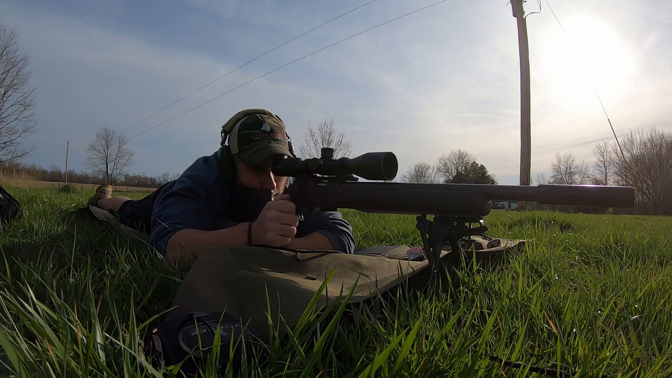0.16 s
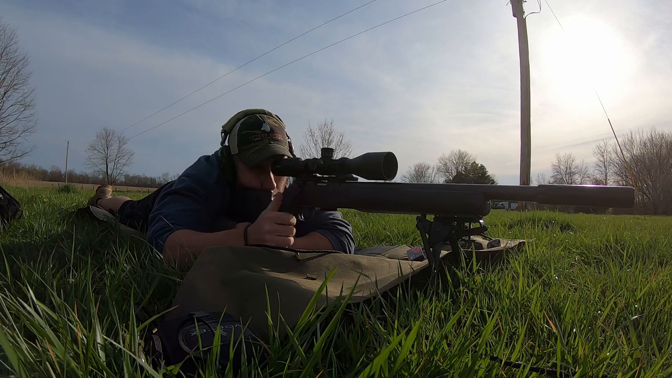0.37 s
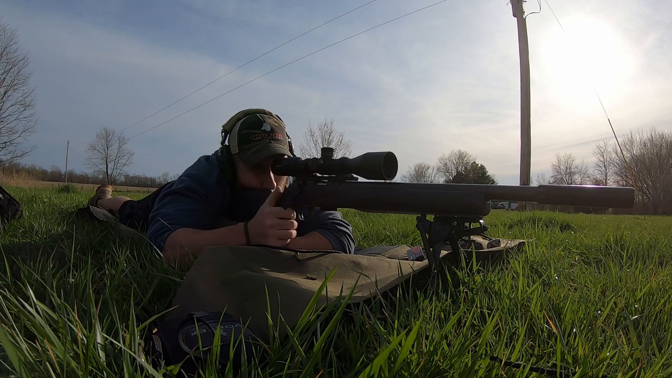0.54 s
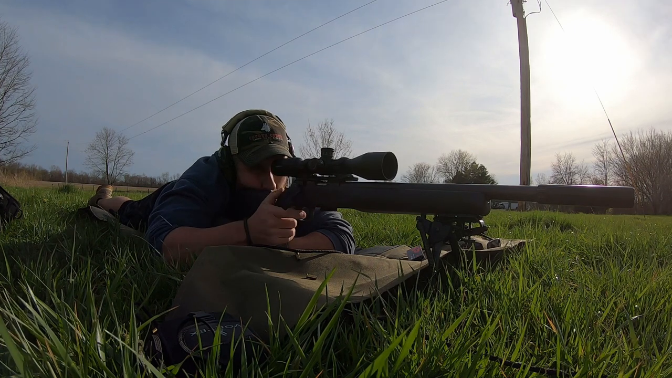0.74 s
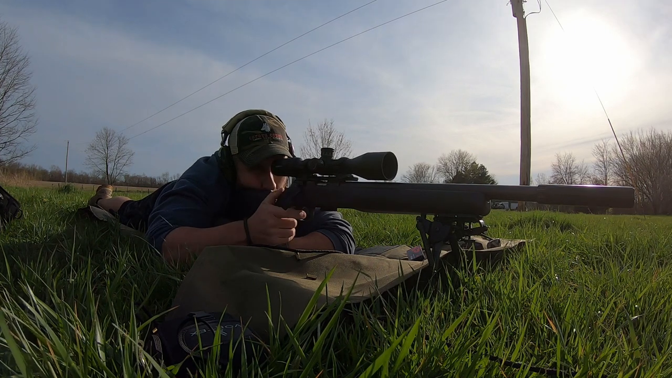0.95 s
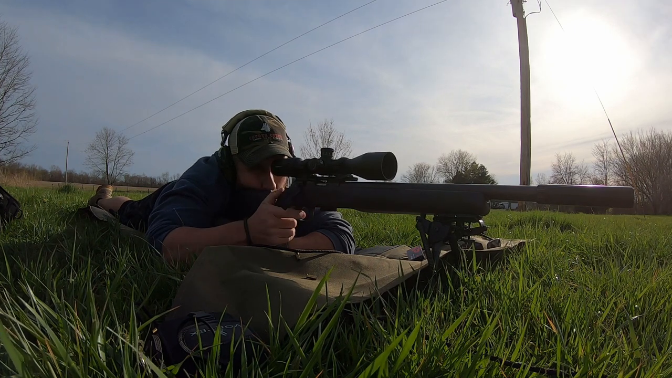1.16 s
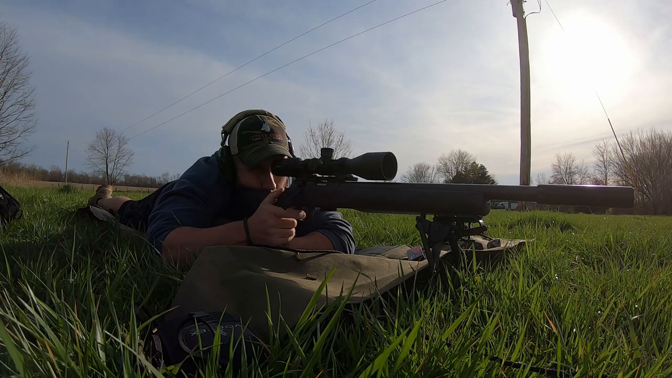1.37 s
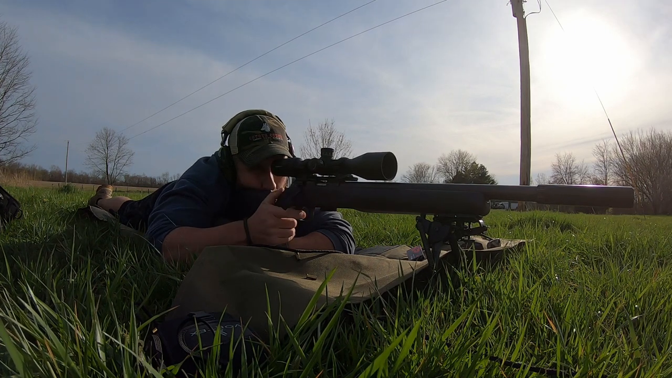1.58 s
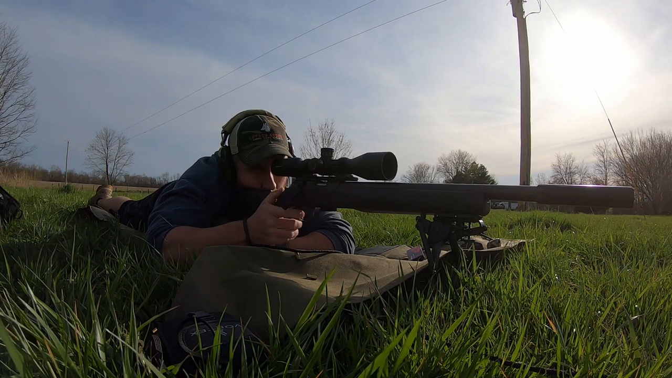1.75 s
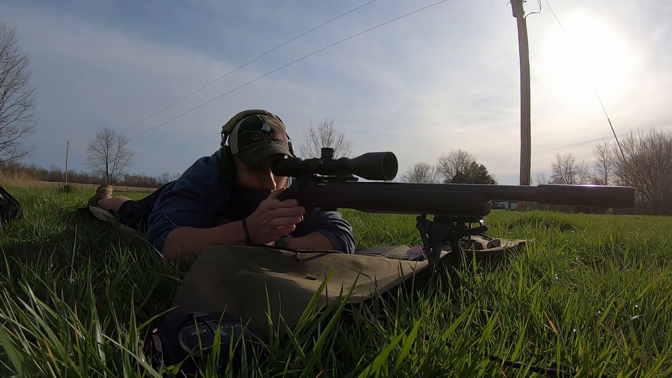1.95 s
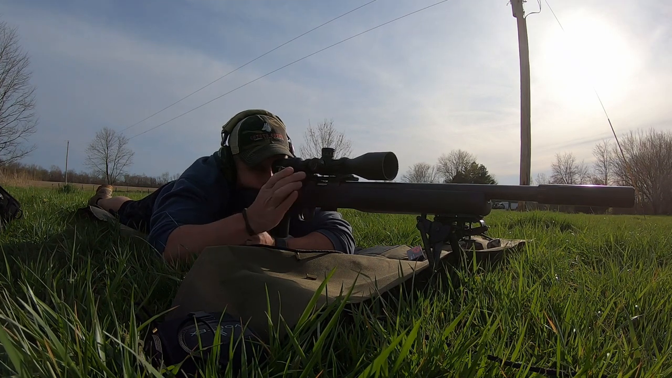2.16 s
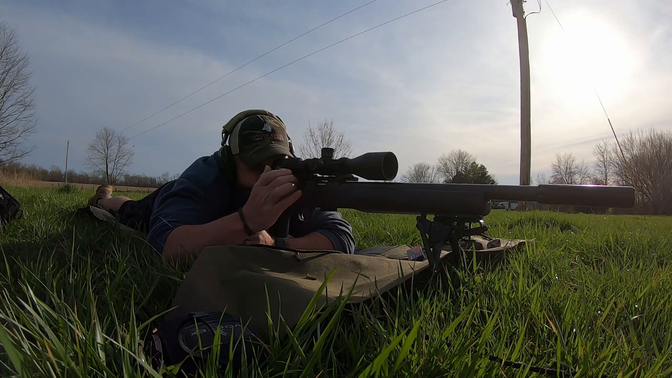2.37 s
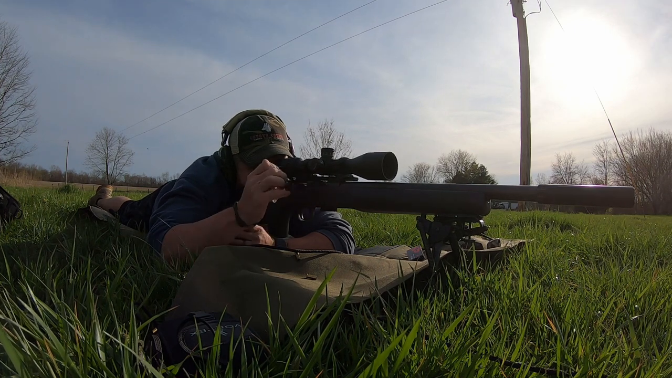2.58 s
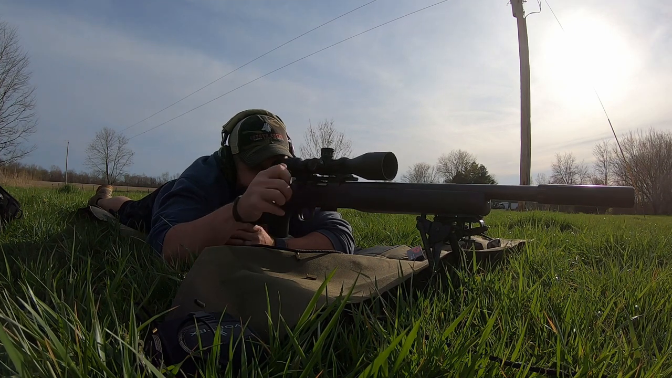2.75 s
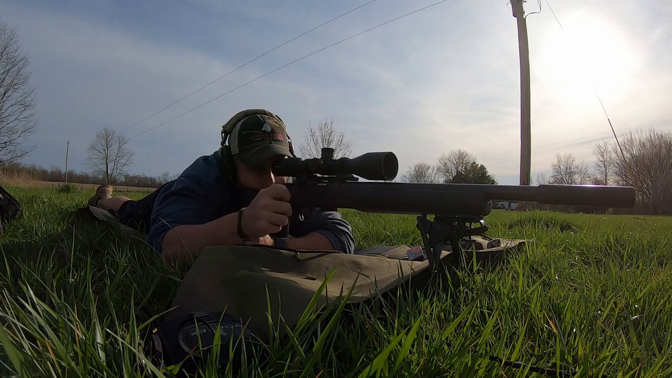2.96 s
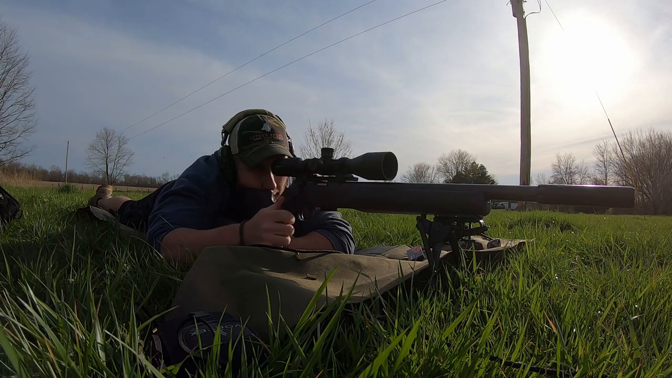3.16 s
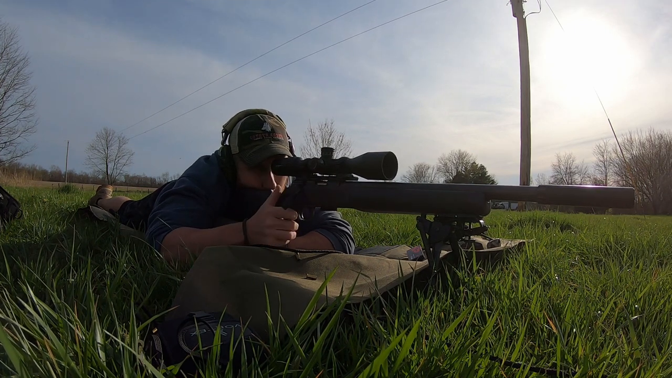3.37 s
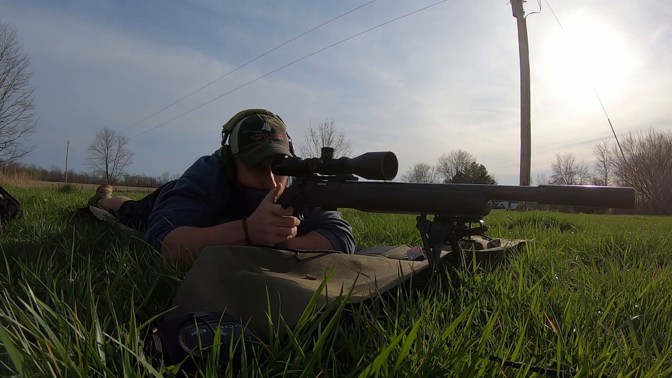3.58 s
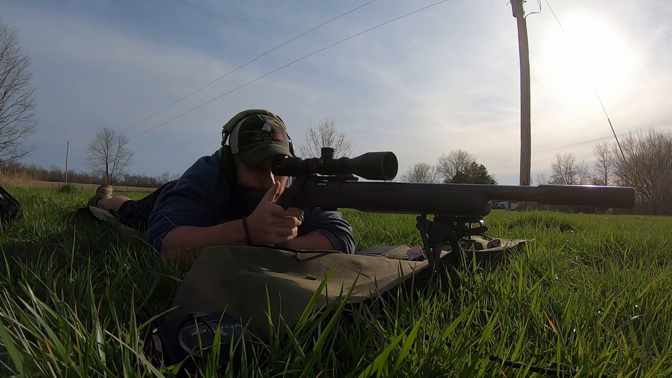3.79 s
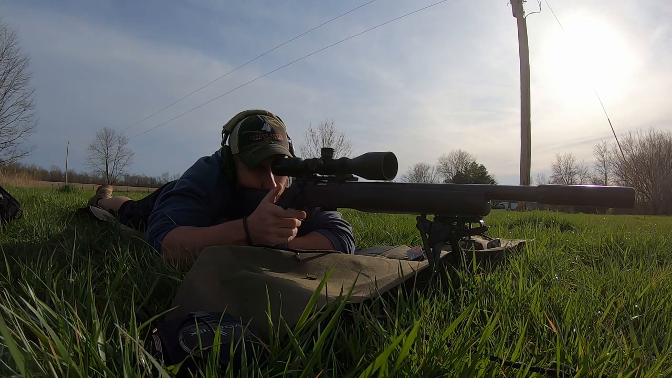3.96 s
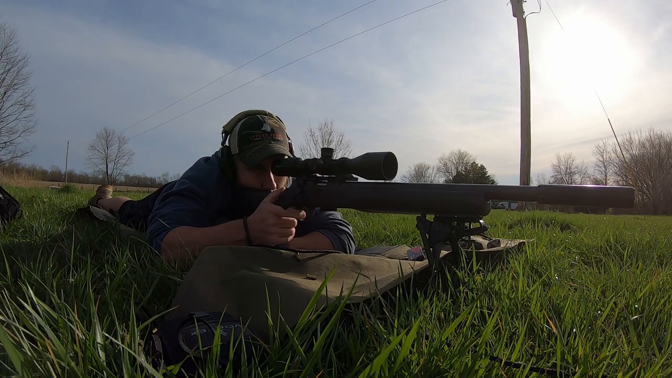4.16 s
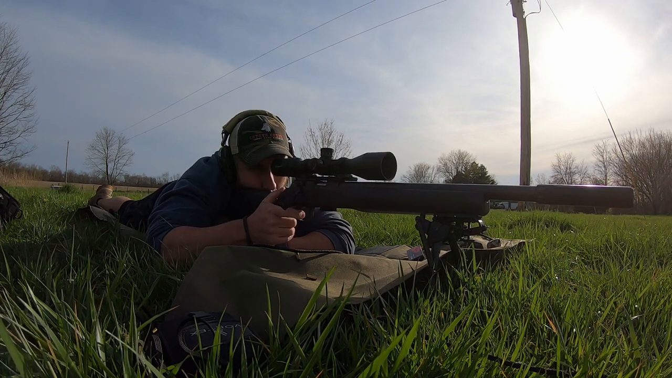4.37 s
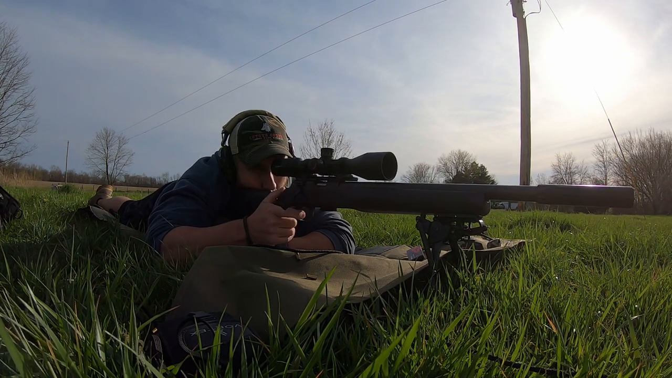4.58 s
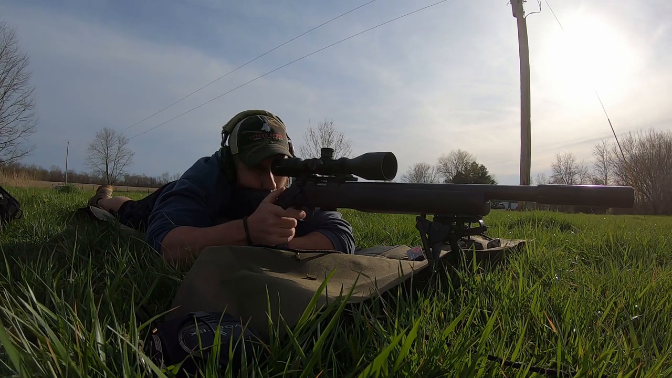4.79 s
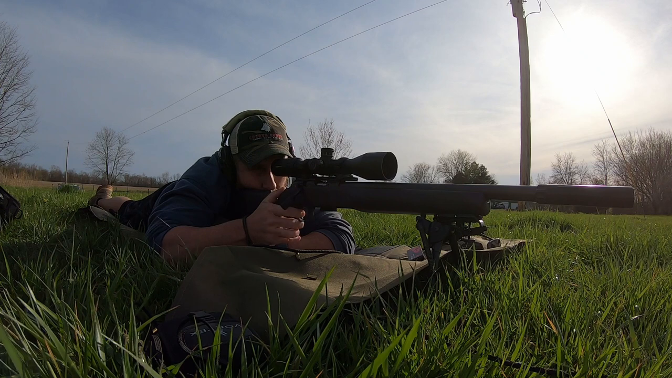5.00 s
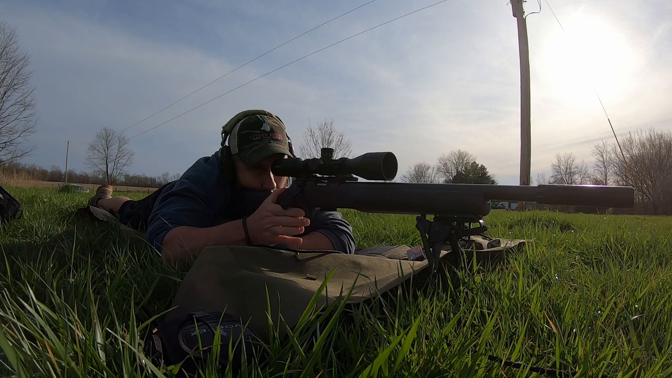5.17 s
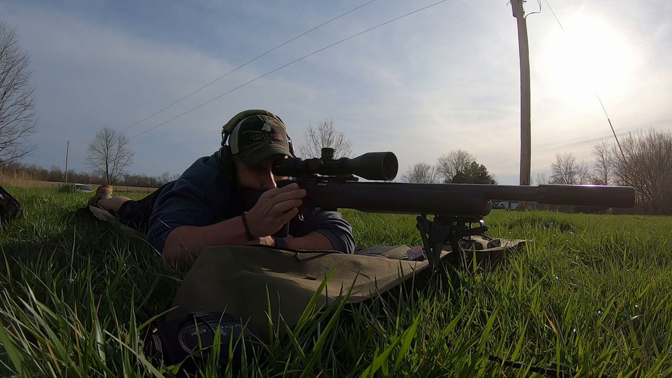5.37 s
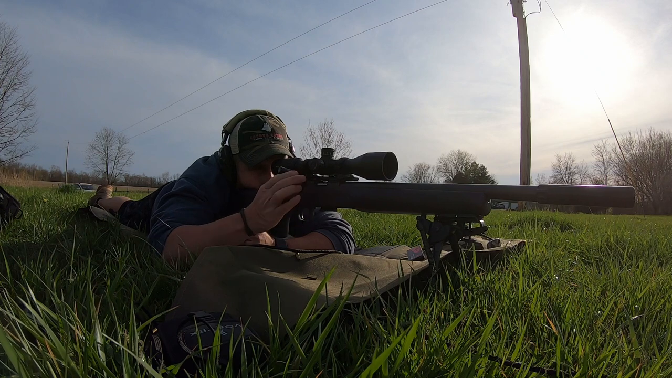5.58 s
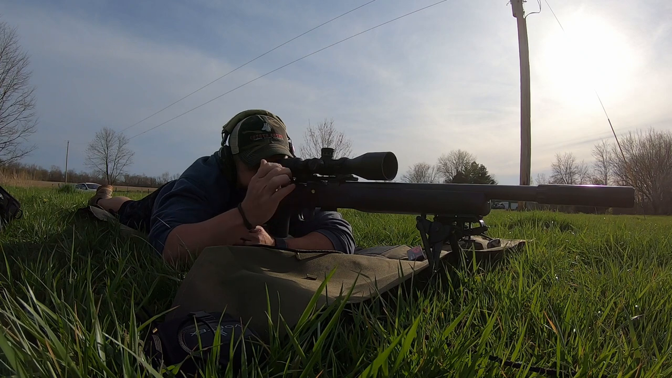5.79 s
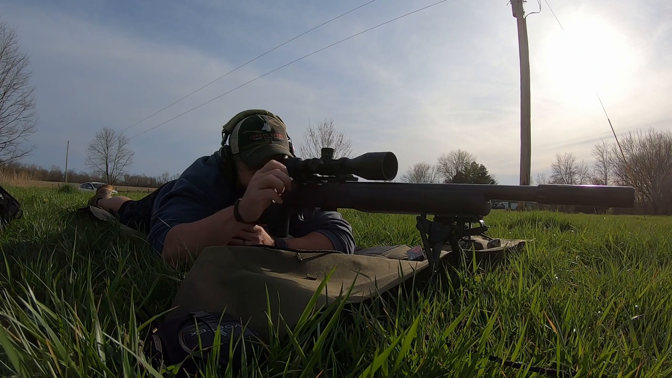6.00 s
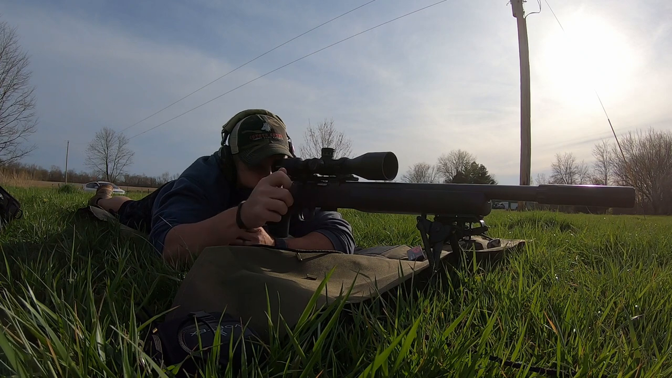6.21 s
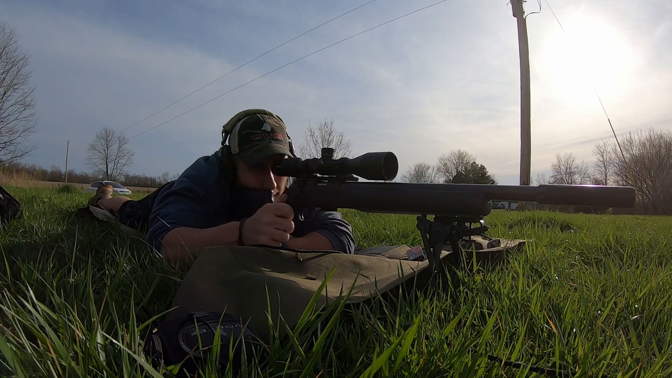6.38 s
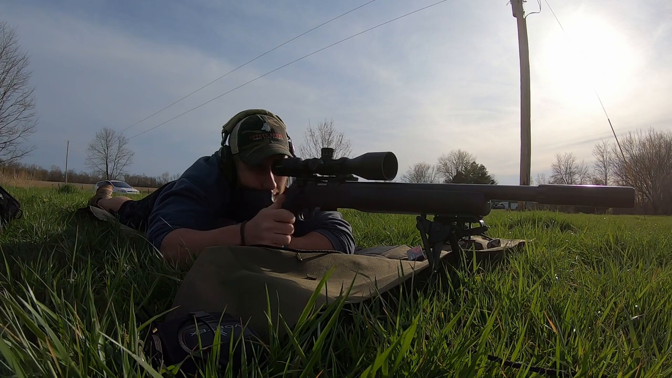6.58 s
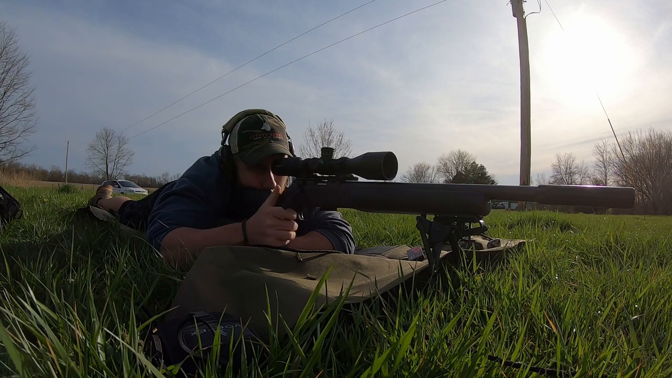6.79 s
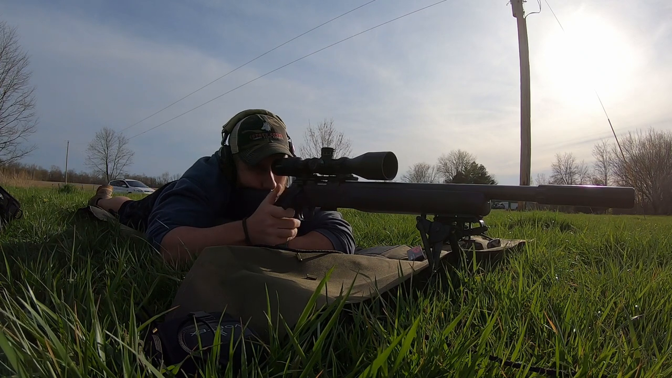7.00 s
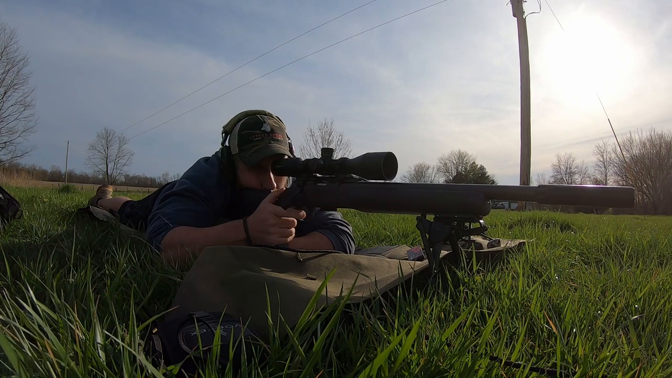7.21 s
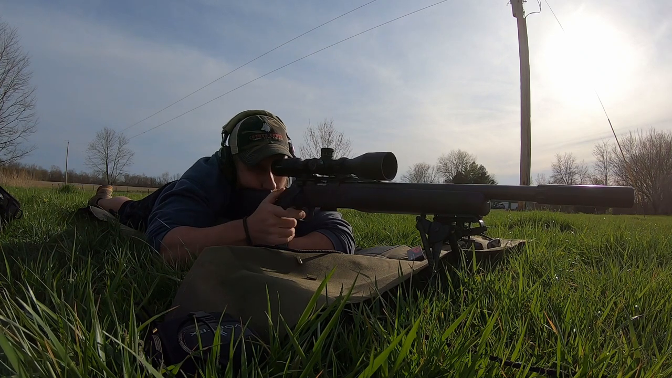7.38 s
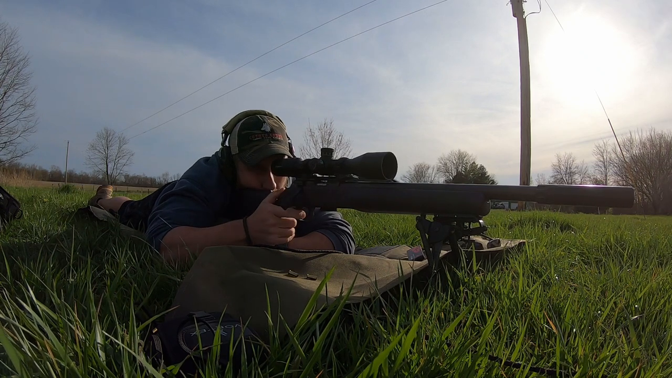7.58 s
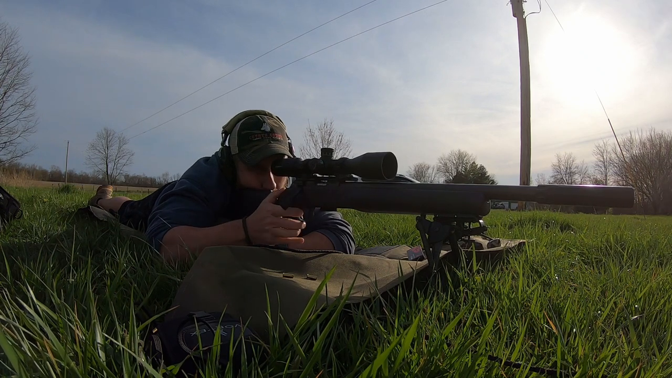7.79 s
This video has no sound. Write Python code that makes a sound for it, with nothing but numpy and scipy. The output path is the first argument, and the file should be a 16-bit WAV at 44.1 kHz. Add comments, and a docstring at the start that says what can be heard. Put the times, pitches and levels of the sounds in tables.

```python
"""Suppressed rifle on a lawn

A small-bore rifle fires three shots (gas noise plus a pressure swing); its bolt is worked between them.
Cracks return from buildings and trees as shaped noise; the bullet smacks a far target.
Wind noise buffets a microphone in the grass, over hiss and rustle.
A motor of wavering partials drones far off; a bird, a gliding sine, whistles three times."""
import sys
import numpy as np
from scipy import signal
from scipy.fft import rfft, irfft, next_fast_len
from scipy.io import wavfile
from scipy.ndimage import uniform_filter1d

SR = 44100
rng = np.random.default_rng(int(sys.argv[2]) if len(sys.argv) > 2 else 0)


def generate_wav(signal):
    """Clip the signal to [-1, 1] and save it as 16-bit WAV at the path in sys.argv[1]."""
    frames = np.transpose(np.atleast_2d(signal))
    scaled = np.clip(frames, -1, 1) * 32767
    pcm = np.round(scaled).astype(np.int16)
    wavfile.write(sys.argv[1], SR, pcm)


N = 346185
TIME = np.arange(N) / SR


def from_db(db):
    """Decibels to gain."""
    return 10 ** (np.asarray(db) / 20)


def rms_one(x):
    """Scale to unit power."""
    return x / np.sqrt(np.mean(x ** 2) + 1e-20)


def level(rows):
    """Gain over time from rows of (time_s, level_db), linear in dB between them."""
    return from_db(np.interp(TIME, *np.transpose(rows)))


def add(out, start_s, sound):
    """Mix a sound in, starting at start_s."""
    i = max(0, round(start_s * SR))
    out[i:i + len(sound)] += sound[:max(0, N - i)]


def colour(x, points):
    """Causal (minimum-phase) filter from rows of (freq_hz, gain_db), built by folding the cepstrum."""
    size = next_fast_len(len(x) // 2 + 1) * 2
    freq_hz, gain_db = np.transpose(points)
    bins_hz = np.arange(size // 2 + 1) * SR / size
    log_gain = np.log(from_db(np.interp(np.log(bins_hz + 1), np.log(freq_hz), gain_db)))
    cepstrum = irfft(log_gain)
    cepstrum[1:size // 2] *= 2
    cepstrum[size // 2 + 1:] = 0
    response = np.exp(rfft(cepstrum))
    return irfft(rfft(x, size) * response)[:len(x)]


def noise(points, size):
    """Coloured noise of unit power."""
    return rms_one(colour(rng.standard_normal(size), points))


def band(x, low_hz, high_hz, order=2):
    """Butterworth band-pass."""
    edges_hz = [low_hz, min(high_hz, SR / 2 - 1)]
    return signal.sosfilt(signal.butter(order, edges_hz, "band", fs=SR, output="sos"), x)


def resonate(x, modes, spread_db):
    """Parallel two-pole resonances, each with a random sign and a strength of its own."""
    out = 0
    for freq_hz, width_hz, level_db in modes:
        radius = np.exp(-np.pi * width_hz / SR)
        angle = 2 * np.pi * freq_hz / SR
        poles = [1, -2 * radius * np.cos(angle), radius * radius]
        ringing = signal.lfilter([1, 0, -1], poles, x)
        gain = from_db(level_db + spread_db * rng.normal())
        out = out + rms_one(ringing) * gain * rng.choice([-1, 1])
    return out


def dying(t, t60):
    """Envelope that falls 60 dB in t60 seconds; held at one while t is negative."""
    return np.exp(-np.log(1000) * np.maximum(t, 0) / t60)


def even(x, span_s):
    """Hold the short-term power of a noise steady."""
    return x / np.sqrt(uniform_filter1d(x * x, max(2, int(span_s * SR))) + 1e-12)


def grainy(size, grain_db, grain_s):
    """Uneven random gain of unit power."""
    knots = np.arange(0, size + 1, max(4., grain_s * SR))
    heights = 2 * rng.random(size)[:len(knots)] - 1
    return rms_one(from_db(grain_db * np.interp(np.arange(size), knots, heights)))


# airy hiss over time: time_s, level_db
AIR_LEVEL = [(0, -50.5), (.55, -51.5), (.72, -56.5), (1.9, -61.5), (2.3, -51.5), (2.95, -48.5),
             (3.2, -61.5), (4.3, -61.5), (5.7, -47.5), (6.7, -59), (7.05, -60.5), (7.09, -53.5)]
# hiss spectrum: freq_hz, density_db_per_hz (relative)
AIR_COLOUR = [(200, 7.5), (600, -2), (850, -0.5), (1150, 2.5), (1450, -1), (2100, -7.5), (3300, -8.5),
              (4400, -15.5), (5300, -27.5), (6200, -59), (8000, -57), (15000, -67)]


def air():
    """Airy hiss: coloured noise whose level drifts, with one quick step up near the end."""
    return level(AIR_LEVEL) * noise(AIR_COLOUR, N)


# grass in the breeze: time_s, level_db
RUSTLE_LEVEL = [(0, -74), (.2, -74), (.37, -62.5), (.5, -74), (.75, -75), (1.0, -90), (7.85, -100)]
# rustle spectrum: freq_hz, density_db_per_hz (relative)
RUSTLE_COLOUR = [(800, -16.5), (2000, -0.5), (3400, -1), (5000, -4), (6300, -16.5), (8000, -9),
                 (11000, -19.5), (15000, -33.5)]


def grass():
    """Grass rustling in the breeze: grainy bright noise."""
    return level(RUSTLE_LEVEL) * noise(RUSTLE_COLOUR, N) * grainy(N, 6.0, 0.0036)


# rumble on the microphone: time_s, level_db
WIND_LEVEL = [(0, -43), (.3, -42), (.5, -33.5), (.98, -33), (1.35, -35.5), (2.05, -35.5), (2.5, -37.5),
              (2.75, -31.5), (3.0, -37.5), (3.87, -37), (4.28, -30.5), (4.6, -39), (4.95, -33), (5.45, -37),
              (5.85, -31), (6.56, -31.5), (6.91, -35), (7.3, -33.5)]
# rumble spectrum: freq_hz, density_db_per_hz (relative)
WIND_COLOUR = [(15, -4.5), (30, 4), (60, 3), (100, 0.5), (170, -5), (250, -22.5), (350, -18), (500, -22.5),
               (800, -35.5), (1500, -71), (4000, -72)]
# strongest buffets: peak_s, half_length_s, level_db (before halving), upper_edge_hz, hoot_hz
BUFFETS = [(.36, 0.049, -24.5, 275, 394), (.625, .046, -29, 360, 437), (1.039, 0.066, -18.5, 358, 507),
           (1.601, 0.062, -23.5, 240, 353), (2.01, 0.054, -18, 332, 567), (2.082, 0.056, -25.5, 100, 1000),
           (2.154, .042, -18, 220, 486), (2.223, .03, -17.5, 180, 295), (4.02, 0.07, -14, 250, 376),
           (4.145, .04, -23.5, 300, 406), (4.876, .049, -18.5, 350, 420), (4.924, 0.039, -18, 314, 714),
           (5.021, 0.031, -24, 180, 760), (5.265, 0.055, -17, 307, 482), (5.99, .1, -21, 388, 640),
           (6.579, 0.079, -24.5, 270, 700), (7.151, 0.17, -27.5, 305, 450), (7.573, 0.078, -18, 239, 400),
           (7.676, 0.047, -24, 300, 555)]


def wind(eddies_db=-9, lumps_db=10, hoot_width=0.14, hoot_rel_db=-20):
    """Rumble and small eddies at the microphone port; strong eddies strike as buffets with a hollow hoot."""
    eddies = rms_one(band(rng.standard_normal(N), 51, 230, order=3)) * grainy(N, lumps_db, .045)
    rumble = even(noise(WIND_COLOUR, N), 0.14)
    out = level(WIND_LEVEL) * (rumble + from_db(eddies_db) * eddies)
    for peak_s, half_length_s, level_db, edge_hz, hoot_hz in BUFFETS:
        size = int(2 * half_length_s * SR)
        spectrum = [(20, -6), (60, 0), (edge_hz * 0.55, -1), (edge_hz, -11), (edge_hz * 2, -36), (edge_hz * 8, -85)]
        eddy = noise(spectrum, size)
        low_hz, high_hz = hoot_hz * (1 - hoot_width), hoot_hz * (1 + hoot_width)
        hoot = band(rng.standard_normal(2 * size), low_hz, high_hz, order=3)[size:]  # settled half
        shape = np.hanning(size) ** 2
        buffet = rms_one(eddy * shape) + from_db(hoot_rel_db) * rms_one(hoot * shape)
        add(out, peak_s - half_length_s, from_db(level_db) * buffet / 2)
    return out


# loudness: time_s, level_db (of the partials)
MOTOR_LEVEL = [(0, -46.5), (.9, -38.5), (1.8, -38.5), (2.6, -41.5), (3.0, -34.5), (3.7, -32), (4.1, -34),
               (4.6, -51.5), (7.0, -53), (7.12, -38.5), (7.85, -56.5)]
# partials: multiple of the firing rate, level_db (relative)
MOTOR_PARTIALS = [(2, -9.5), (3, -6), (4, -1.5), (6, -17), (8, -26.5)]


def motor(firing_hz=49.2, waver_hz=3.3, waver=0.18, growl_rel_db=-7):
    """A far engine: partials that waver on their way through the air, over a low growl."""
    partials = 0
    for multiple, level_db in MOTOR_PARTIALS:
        slow = signal.resample(rng.standard_normal((int(2 * waver_hz * N / SR), 2)), N // 100)
        slow_s = np.linspace(0, TIME[-1], len(slow))
        swing, phase = (np.interp(TIME, slow_s, column) for column in slow.T)
        tone = np.sin(2 * np.pi * multiple * firing_hz * TIME + 2 * waver * phase)
        partials = partials + from_db(level_db) * (1 + waver * swing) * tone
    growl = from_db(growl_rel_db) * rms_one(band(rng.standard_normal(N), 135, 230.7, order=3))
    return level(MOTOR_LEVEL) * (rms_one(partials) + growl)


# calls: start_s, level_db
CALLS = [(3.115, -58), (3.385, -50), (3.662, -48.5)]
# shape of a call: time_into_call_s, pitch_hz, level_db (relative to the call)
WHISTLE = [(0, 3150, -20), (.015, 2970, -2), (.052, 3030, 0), (.068, 2860, -1), (.088, 2480, -5),
           (.112, 2260, -7), (.125, 2290, -26), (.14, 2760, -10), (.16, 2660, -11), (.175, 2750, -50)]


def bird(flutter_db=3.0):
    """A held whistle that slurs down and ends in a soft grace note, fluttering in the wind."""
    out = np.zeros(N)
    point_s, point_hz, point_db = np.transpose(WHISTLE)
    t = TIME[:int(point_s[-1] * SR)]
    for start_s, call_db in CALLS:
        pitch_hz = np.interp(t, point_s, point_hz) * (1 + 0.0032 * rng.normal())
        gain = from_db(call_db + np.interp(t, point_s, point_db))
        call = gain * np.sin(2 * np.pi * np.cumsum(pitch_hz) / SR)
        add(out, start_s, call * grainy(len(t), flutter_db, 0.0071))
    return out


def among_trees(x, wet_db=-20, t60=.6):
    """A far sound with the soft tail that trees send back: convolution with decaying noise."""
    tail = rng.standard_normal(SR) * dying(TIME[:SR], t60)
    return x + from_db(wet_db) * signal.fftconvolve(x, tail / np.linalg.norm(tail))[:N]


# resonances of each part: freq_hz, width_hz, level_db (relative)
STOCK_MODES = [(292, 210, -8.5), (426, 28, -3), (531, 73, -1.5), (758.5, 110, 0), (1008, 90, -3),
               (1284, 150, -3.5)]
HANDLE_MODES = [(1631, 110, -5), (1980, 190, -5), (2243, 150, -1.5), (2510, 530, 0)]
STEEL_MODES = [(2940, 160, -3), (3185, 200, 0.5), (3566, 140, -2.5), (4053, 120, -4), (4420, 78, -8.5),
               (4690, 140, -8.5), (5310, 250, -13.5), (6000, 220, -11.5)]
TICK_MODES = [(7230, 370, 4.5), (7660, 330, -9), (10200, 900, -5), (12030, 2600, -4.5)]


def contact(levels_db, chatter_t60=0.012, seat_s=.0012, after_db=-25, after_t60=0.1, grain_db=5.5):
    """One contact seats over a millisecond and chatters, ringing stock, handle and steel."""
    out, t, window = 0, TIME[:SR // 10], SR // 125
    parts = [(STOCK_MODES, 220, 1500), (HANDLE_MODES, 1300, 2900),
             (STEEL_MODES, 2500, 5600), (TICK_MODES, 6200, 12500)]
    decay = dying(t - seat_s, chatter_t60) + from_db(after_db) * dying(t, after_t60)
    shape = np.minimum(t / seat_s, 1) * decay
    force = rng.standard_normal(len(t)) * shape * grainy(len(t), grain_db, 0.00045)
    for (modes, low_hz, high_hz), level_db in zip(parts, levels_db):
        ring = band(resonate(force, modes, spread_db=1.0), low_hz, high_hz, order=3)
        out = out + from_db(level_db) * ring / np.sqrt(2 * np.mean(ring[:window] ** 2))  # level of first 8 ms
    return out


# burst spectrum: freq_hz, density_db_per_hz (relative)
BURST_COLOUR = [(500, -11), (1200, 17), (2400, 20), (3600, -5.5), (4700, -37), (5800, -38.5), (9000, -46.5),
                (15000, -56.5)]


def burst(length_s, noise_db, ring_db, fine_db=3.5, coarse_db=4.5, tick_rel_db=-25):
    """Uneven grainy noise with ringing: one noise, grained finely and coarsely, drives the resonances."""
    size = int(length_s * SR)
    grains = rng.standard_normal(size) * grainy(size, fine_db, .0008) * grainy(size, coarse_db, .005)
    ring = rms_one(band(resonate(grains, STEEL_MODES, spread_db=2.0), 3170, 5200, order=4))
    tick = rms_one(band(resonate(grains, TICK_MODES, spread_db=7.5), 6900, 13300))
    ring += from_db(tick_rel_db) * tick
    coloured = rms_one(colour(grains, BURST_COLOUR))
    return (from_db(noise_db) * coloured + from_db(ring_db) * ring) * signal.windows.tukey(size, .6)


# working the bolt: stop_s, move, strength_db (added to the levels of the move)
BOLT_WORK = [(0.0848, "knock", -2), (1.9356, "tap", -11), (1.9519, "tap", 3), (2.1077, "tap", 1),
             (2.1208, "lift", -0.5), (2.3883, "tap", 12), (2.402, "tap", 12), (2.427, "pull", 0),
             (2.621, "feed", 1), (2.6409, "tap", -2), (2.686, "feed", -1), (2.7126, "push", 0),
             (2.7727, "tap", 12.5), (2.781, "lock", -0.5), (2.8464, "tap", -3), (2.903, "tap", -4.5),
             (3.0232, "knock", 2), (5.288, "tap", -4.5), (5.464, "lift", 2), (5.809, "pull", -1),
             (5.9191, "feed", -2.5), (5.9979, "tap", -2.5), (6.065, "push", -1), (6.1143, "lock", 3),
             (6.1456, "feed", -9.5), (6.2425, "feed", -12.5), (6.2749, "tap", -5), (6.4196, "knock", 0)]
# contacts of each move: offset_from_stop_s, stock_db, handle_db, steel_db, tick_db
MOVE_CONTACTS = { "lift": [(0, -34, -14, -17, -43.5), (.006, -27.5, -17, -22.5, -44.5)],
                 "pull": [(-.055, -42, -22.5, -30.5, -54.5), (-.04, -33.5, -23, -33, -55.5),
                 (-.0175, -37, -22, -19, -42), (0, -21, -13.5, -14, -33.5), (.016, -30, -26, -34, -57)],
                 "feed": [(0.00046, -24, -33, -38.5, -83)], "push": [(-.019, -27, -42, -34, -52),
                 (0, -28, -18, -14.5, -36), (.012, -37, -32, -26.5, -52)],
                 "lock": [(0.00047, -34, -20.5, -24, -45)], "knock": [(0.00015, -21.5, -25.5, -24.5, -51)],
                 "tap": [(0.0012, -45, -34.5, -39, -64.5)]}
# noise bursts around the contacts: offset_from_stop_s, length_s, noise_db, ring_db
MOVE_BURSTS = { "lift": [(-.022, .04, -37, -37), (-.01, 0.32, -48.5, -71)],
               "pull": [(-.071, .103, -32.5, -32.5), (.012, 0.14, -52, -68.5)],
               "push": [(-.031, 0.055, -37, -37)], "lock": [(-.028, 0.0435, -37, -38)],
               "knock": [(-0.017, 0.024, -58, -50)]}


def bolt():
    """Each move plays its own run of contacts, and any noise bursts around them, harder or softer."""
    out = np.zeros(N)
    for stop_s, move, strength_db in BOLT_WORK:
        strength = from_db(strength_db)
        for offset_s, *levels_db in MOVE_CONTACTS[move]:
            add(out, stop_s + offset_s, strength * contact(levels_db))
        for offset_s, *settings in MOVE_BURSTS.get(move, []):
            add(out, stop_s + offset_s, strength * burst(*settings))
    return out


# crack spectrum: freq_hz, density_db_per_hz (relative)
CRACK_COLOUR = [(150, -2.5), (500, -4), (950, -9.5), (1300, -4), (2500, -4), (4000, -2.5), (4900, -11),
                (5600, -17.5), (6500, -34.5), (7800, -14), (8900, -26.5), (10300, -22.5), (12500, -33),
                (15500, -49)]


def report(crack_db, blast_db, blast_hz=155, blast_s=0.0039, crack_t60=0.084, hold_s=0.0044, edge_db=-9):
    """Muzzle report: a sharp front, a rush of gas and one heavy swing of pressure."""
    t = TIME[:SR // 4]
    gas = noise(CRACK_COLOUR, len(t)) * dying(t - hold_s, crack_t60)
    front = from_db(edge_db) * rng.standard_normal(len(t)) * dying(t, 0.014)
    blast = np.cos(2 * np.pi * blast_hz * t - .5) * np.exp(-((t - .0035) / blast_s) ** 2)
    return from_db(crack_db) * (gas + front) + from_db(blast_db) * blast


# narrow wavering tones that swell before the crack: freq_hz, width_hz, level_db (relative)
SWELL_TONES = [(610, 47, -9.5), (792, 400, -11.5), (2080, 20, -10.5), (2180, 27, -7.5), (2636, 32, -5.5),
               (2875, 18, -7.5), (3170, 18, -4.5), (3470, 15, -7), (3760, 23, -2.5), (3830, 20, -2),
               (3975, 27, -5.5), (4130, 15, -9.5), (4540, 26, -5.5), (4810, 78, -10)]


def swell(rise_t60=0.049, plateau_s=0.021, sizzle_rel_db=-41):
    """Narrow wavering tones that swell over the last hundredths of a second before the crack."""
    t = TIME[:SR // 8]
    tones = 0
    for freq_hz, width_hz, level_db in SWELL_TONES:
        steps = rng.standard_normal(len(t))
        wander = np.cumsum(steps) * np.sqrt(2 * np.pi * width_hz / SR)  # gives the tone its width
        gain = from_db(level_db + 2 * rng.normal())
        tones = tones + gain * np.sin(2 * np.pi * freq_hz * t + wander)
    sizzle = from_db(sizzle_rel_db) * rms_one(band(rng.standard_normal(len(t)), 7500, 12500))
    left_s = t[-1] - t
    shape = dying(left_s - plateau_s, rise_t60) * dying(left_s, 0.11)
    return (rms_one(band(tones, 360, 5300, order=8)) + sizzle) * shape


# scatter from the field: freq_hz, early_db_per_hz, late_db_per_hz (both relative), late_t60_s
SCATTER = [(200, -4.5, -7.5, 1.2), (404.5, 9, -4.5, 1.2), (750, 5, -8.5, 0.85), (1110, -1.5, -4, 0.64),
           (1730, -14.5, -3, 1.33), (3230, 5.5, 0, 1.11), (4370, -2, -9, 0.78), (6040, -23.5, -29, .65),
           (7900, -19, -38, .55), (10700, -24, -29, 0.34), (13000, -33, -46, .4), (15500, -48, -56, .3)]


def scatter(early_db=-33, late_db=-36, late_s=0.29, early_t60=1.3):
    """Grass scatters the crack at once; the tree line answers later, each band dying at its own rate."""
    t, out = TIME[:2 * SR], 0
    freq_hz, *columns = np.transpose(SCATTER)
    edges_hz = np.geomspace(150, 16000, 21)
    for low_hz, high_hz in zip(edges_hz, edges_hz[1:]):
        centre = np.log(low_hz * high_hz) / 2
        near_db, far_db, far_t60 = (np.interp(centre, np.log(freq_hz), column) for column in columns)
        first = from_db(early_db + near_db) * dying(t, early_t60) * dying(t - late_s, 0.31)
        first = first * np.minimum(t / 0.0052, 1)
        second = from_db(late_db + far_db) * dying(t - late_s, far_t60) * dying(late_s - t, 0.098)
        out = out + band(rng.standard_normal(len(t)), low_hz, high_hz, order=4) * np.hypot(first, second)
    return 2.39 * out  # overall gain


# the bullet reaches the far target: hit_s, smack_db, thud_db
TARGET_HITS = [(1.3733, -18.5, -17), (4.6650, -33, -18.5), (7.5562, -23, -17.5)]


def target(thud_t60=0.049):
    """The bullet smacks the far target: a burst of coloured noise over a narrow-band thud."""
    out, t = np.zeros(N), TIME[:SR // 3]
    smack_colour = [(500, 6), (3500, 8.0), (6000, -14.5), (10000, -15.5), (15000, -43)]  # freq_hz, db
    for hit_s, smack_db, thud_db in TARGET_HITS:
        smack = from_db(smack_db) * noise(smack_colour, len(t))
        thud = even(band(rng.standard_normal(len(t)), 328, 485), 0.0085) * np.minimum(t / 0.00086, 1)
        add(out, hit_s, smack * dying(t, 0.038) + from_db(thud_db) * thud * dying(t, thud_t60))
    return out


# shots: start_s, crack_db, blast_db, swell_db, echo_db (added to every echo)
SHOTS = [(1.1100, -9, -2.5, -7.5, -2.5), (4.4022, -8, -5, -7, 0.5), (7.2964, -10, -6.5, -7, -0.5)]
# echoes from buildings and trees: peak_delay_s, level_db, rise_t60_s, fall_t60_s
ECHOES = [(.0985, -20, 0.047, 0.035), (.209, -22, 0.058, 0.033), (.241, -20.5, 0.06, .06),
          (.271, -17.5, 0.053, 0.13), (.289, -21, .08, .12), (.351, -36, 0.13, 0.27)]
# echo spectrum: freq_hz, density_db_per_hz (relative)
ECHO_COLOUR = [(200, -0.5), (600, -3.5), (1100, -7), (2000, 3), (3000, 11.5), (4100, 5), (5000, -7),
               (6300, -35.5), (8000, -21.5), (11000, -46.5), (15000, -42.5)]


def rifle(grain_db=6.5):
    """Each shot: a swell of tones, report, scatter, then echoes as noise that rises to a peak and falls."""
    out, t = np.zeros(N), TIME[:SR // 3]
    from_peak_s = t - t[-1] / 2
    for start_s, crack_db, blast_db, swell_db, echo_db in SHOTS:
        lead = from_db(swell_db) * swell()
        add(out, start_s - len(lead) / SR, lead)
        add(out, start_s, report(crack_db, blast_db))
        add(out, start_s, scatter() * grainy(2 * SR, grain_db / 2, 0.0034))
        for delay_s, level_db, rise_t60, fall_t60 in ECHOES:
            shape = dying(-from_peak_s, rise_t60) * dying(from_peak_s, fall_t60)
            shape = shape * grainy(len(t), grain_db, 0.0016)
            echo = from_db(level_db + echo_db) * shape * noise(ECHO_COLOUR, len(t))
            add(out, start_s + delay_s + from_peak_s[0], echo)
    return out


def scene():
    """All sources reach one microphone, so both channels are alike."""
    mono = air() + grass() + wind() + motor() + among_trees(bird()) + bolt() + target() + rifle()
    return np.array([mono, mono])


def record(dry, cutoff_hz=15700):
    """The loudest peaks are rounded off at full scale and the top is cut."""
    held = dry / (1 + dry ** 8) ** (1 / 8)
    return signal.sosfilt(signal.ellip(14, .1, 80, cutoff_hz, fs=SR, output="sos"), held)


dry = scene()
out = record(dry)
generate_wav(out)
```